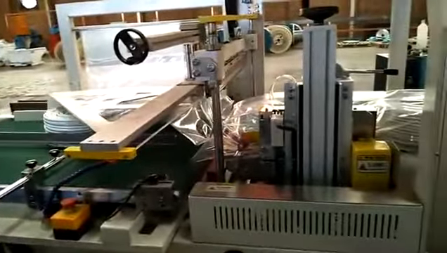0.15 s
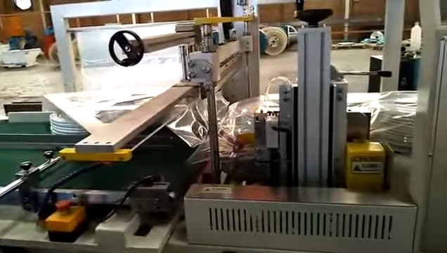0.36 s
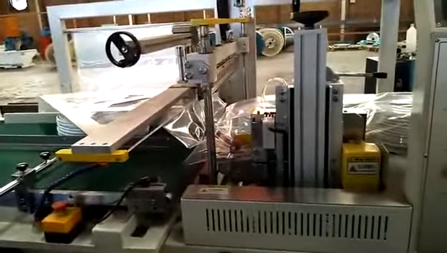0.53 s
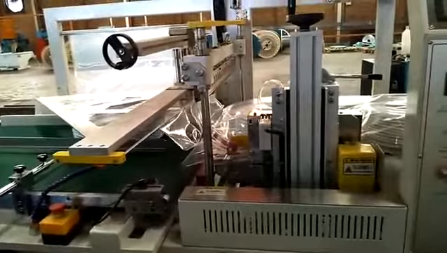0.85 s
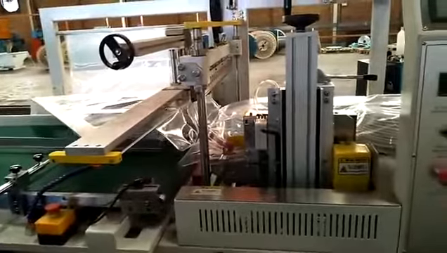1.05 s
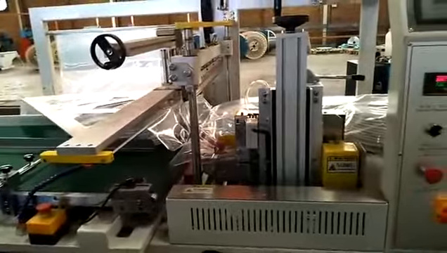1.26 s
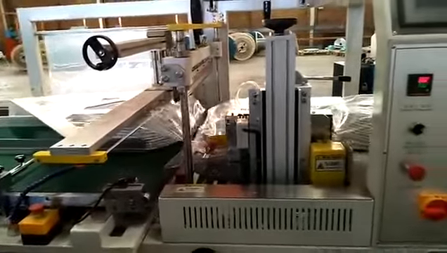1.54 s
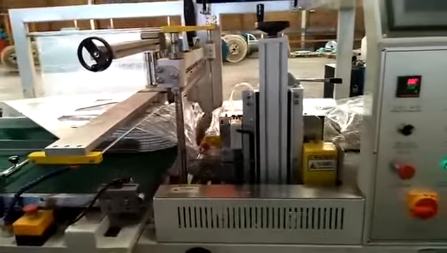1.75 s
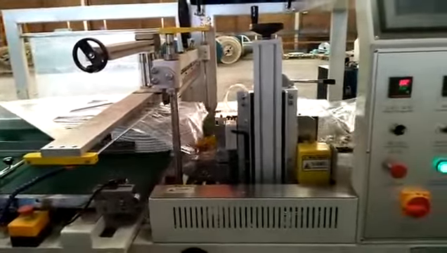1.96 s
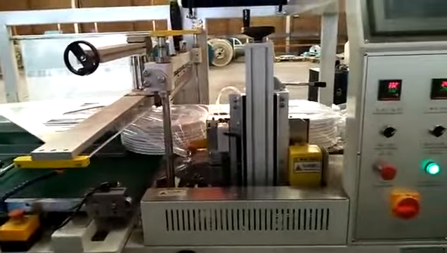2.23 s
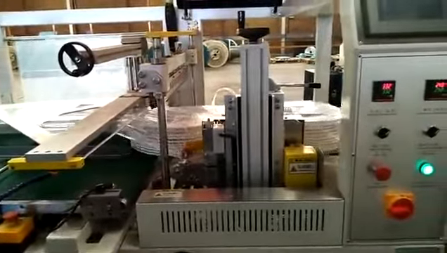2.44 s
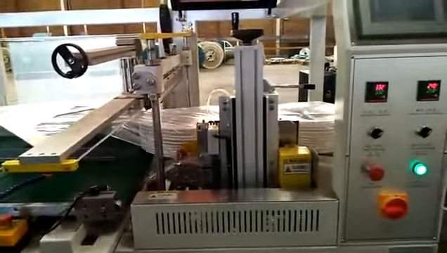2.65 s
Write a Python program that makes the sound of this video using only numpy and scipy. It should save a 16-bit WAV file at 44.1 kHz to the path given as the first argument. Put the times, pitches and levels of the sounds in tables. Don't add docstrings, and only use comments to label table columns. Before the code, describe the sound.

A packing machine hums with beating motors, gear whine and blower hiss; about a second in, a dull knock and short air burst, then a jingling, scraping conveyor chain, captured close on a phone in a hard hall.

```python
import sys
import numpy as np
from scipy import signal
from scipy.io import wavfile
from scipy.ndimage import uniform_filter1d

SR = 44100
rng = np.random.default_rng(int(sys.argv[2]) if len(sys.argv) > 2 else 0)


def how_loud(loudness_db):
    steps = np.asarray(loudness_db, float) / 20
    return 10 ** steps


def persist_wave(psi):
    counts = np.round(np.clip(psi, -1, 1) * 32767).astype(np.int16)
    wavfile.write(sys.argv[1], SR, np.atleast_2d(counts).T)


N = 123480

# freq_hz, left_minus_right_db
PORT_LEAN = [(600, .5), (1300, 2.5), (2400, 5), (3900, 2.5), (7300, -2), (9300, 9), (11300, 4.5),
             (13600, -1)]


def read(points, hz):
    f, value = np.transpose(points)
    return np.interp(np.log(hz + 1), np.log(f + 1), value)


def evened(x):
    return x / np.sqrt(np.mean(abs(x) ** 2) + 1e-20)


def add(mix, s, sound):
    part = mix[:, round(s * SR):][:, :sound.shape[1]]
    part += sound[:, :part.shape[1]]


def sides(lean_db):
    return how_loud(np.array([[.5], [-.5]]) * lean_db)


def wander(width_hz):
    hz = np.fft.fftfreq(N, 1 / SR)
    z = rng.standard_normal((N, 2)) @ np.array([1, 1j])
    return evened(np.fft.ifft(z * np.exp(-(hz / width_hz) ** 2)))


def air(colour, patchy_db):
    # freq_hz, likeness_0_to_1
    port_likeness = [(60, 11), (130, 0.6), (280, 1), (610, 0.66), (1330, -0.28), (2900, 0.03),
                     (6290, -0.07), (13600, -0.13)]
    frames, hz = N // 256 + 5, np.fft.rfftfreq(1024, 1 / SR)
    a, b, c, d, patches = rng.standard_normal((frames, 513, 5)).T
    patches = uniform_filter1d(patches, size=12, axis=0)
    patches = evened(uniform_filter1d(patches, size=14, axis=1))
    same = np.clip(read(port_likeness, hz), -1, 1)[:, None]
    left = a + 1j * b
    right = same * left + np.sqrt(1 - same ** 2) * (c + 1j * d)
    gain = how_loud(read(colour, hz)[:, None] + patchy_db * patches)
    z = np.array([left, right]) * gain * sides(read(PORT_LEAN, hz))[:, :, None]
    return evened(signal.istft(z, nperseg=1024, noverlap=768)[1][:, :N])


def rumble():
    # freq_hz, density_db
    rumble_colour = [(20, -30), (50, -39), (65, 0), (110, -9.5), (276, -2.5), (500, -12), (800, -11),
                     (1500, -16.5)]
    return how_loud(-24.5) * air(rumble_colour + [(2200, -43.5)], patchy_db=0.53)


def hiss():
    # freq_hz, density_db
    hiss_colour = [(1400, -13.5), (2500, -7.5), (3200, -13), (3800, -13.5), (4900, -12.5), (8000, -11.5),
                   (10000, -20), (12000, -29)]
    return how_loud(-21.5) * air([(900, -24.0)] + hiss_colour + [(14500, -37.5)], patchy_db=1.08)


def hum():
    # freq_hz, level_db, wavering_width_hz
    hum_tones = [(134.8, -47, 3.6), (199.8, -41.5, 2.7), (265.8, -30, 4.1), (297.7, -35, 8.8),
                 (331, -40.5, 0.56), (399.8, -31.5, 1.8), (529.6, -43, 5.5), (601, -44.5, 3.5),
                 (627, -39, 4.7), (785.5, -42, 4), (842, -44, 6)]
    steady = 0.86
    t, out = np.arange(N) / SR, np.zeros((2, N))
    for hz, db, width_hz in hum_tones:
        unrest = (1 - steady) * np.clip((hz / 400) ** 5, 1.6 - hz / 500, 5)
        turn = np.exp(2j * np.pi * hz * t)
        shared = evened(steady + unrest * wander(width_hz)) * turn * np.exp(2j * np.pi * rng.random())
        opposed = 0.57 * min(hz / 600, 1) * wander(width_hz) * turn
        out += np.sqrt(2) * how_loud(db) * np.array([shared + opposed, shared - opposed]).real
    return out


def twins():
    # shaft_multiple, level_db, cancelling_s
    twin_orders = [(2, -32, .82), (3, -30, 0.1)]
    shaft_hz, slip_hz = 66.37, .415
    t, out = np.arange(N) / SR, 0
    for k, db, s in twin_orders:
        beat = np.sin(np.pi * k * slip_hz * (t - s))
        out = out + 2 * how_loud(db) * beat * np.cos(2 * np.pi * k * shaft_hz * t)
    return out


def whine():
    # time_s, level_db, wavering_0_to_1
    whine_course = [(0.0, -39.5, 0.2), (0.05, -32.5, 0.2), (0.75, -33, 0), (1.28, -27.5, 0.25),
                    (1.4, -38, 0.1), (1.45, -27, 0.25), (1.56, -47, 0.15), (1.58, -34, 0.3),
                    (1.88, -36, 0.3), (1.95, -44, 0.15), (2.06, -29, 0), (2.12, -39.5, 0.25),
                    (2.27, -30, 0.2), (2.32, -45, 0.15), (2.43, -33, 0.25), (2.8, -34, 0.06)]
    # offset_hz, level_db
    gear_sidebands = [(-277, -11.5), (-240, -6), (-200, -12.5), (-121, -11), (77.5, -12.5), (349, -11),
                      (620.5, -19), (1280.5, -13)]
    mesh_hz, lean_db, port_lag_rad = 2686, 12.5, 0.12
    sideband_hold = .6
    t, (s, course_db, course_shake) = np.arange(N) / SR, np.transpose(whine_course)
    db = np.interp(t, s, course_db)
    shake = np.clip(np.interp(t, s, course_shake), 0, 1)
    left = 1 - shake + shake * wander(4.8)
    right = np.exp(1j * port_lag_rad) * (1 - shake) + shake * wander(5.4)
    out = np.array([left, right])
    for off_hz, side_db in gear_sidebands:
        gain = how_loud(side_db + sideband_hold * (db.mean() - db))
        out = out + gain * np.array([wander(6.6), wander(4.7)]) * np.exp(2j * np.pi * off_hz * t)
    turn = np.exp(2j * np.pi * mesh_hz * t)
    return np.sqrt(2) * how_loud(db) * sides(lean_db) * (out * turn).real


def knocks(mix, bright):
    # start_s, level_db, body_hz, t60_s, click_db
    cylinder_knocks = [
        (1.008, -14, 887, 0.054, -6),
        (1.022, -9.5, 887, 0.047, -21),
        (1.049, -21.5, 887, 0.11, -24),
        (1.296, -18.5, 765, 0.11, -4),
    ]
    t = np.arange(0, .25, 1 / SR)
    for s, db, hz, t60, click_db in cylinder_knocks:
        ring = np.sin(2 * np.pi * hz * t)
        ring += 0.41 * np.sin(2 * np.pi * hz * 1.13 * t) + 0.3 * np.sin(2 * np.pi * hz * 2.4 * t)
        puff = how_loud(click_db - 60 * t / 0.34) * bright[:, round(s * SR):][:, :len(t)]
        body = how_loud(-60 * t / t60) * ring * sides(2.3)
        add(mix, s, how_loud(db) * np.minimum(t / 0.0042, 1) * (body + puff))


def vent():
    # time_s, pressure_db
    vent_pressure = [
        (1.2, -36),
        (1.212, -24),
        (1.225, -10),
        (1.235, -14),
        (1.245, -10.5),
        (1.258, -13),
        (1.272, -15.5),
        (1.285, -20),
        (1.33, -24),
    ]
    # freq_hz, density_db
    nozzle_colour = [(900, -8), (1800, -11.5), (2700, -2), (3200, -6), (4200, -7.5), (7600, -1.5),
                     (10000, -7.5), (14100, -22)]
    # time_s, boost_db
    spool_slams = [
        (1.2285, 3.5),
        (1.2445, 4.5),
        (1.2555, 3),
    ]
    pipe_hz, pipe_width_hz, pipe_db, pipe_s = 3100, 120, -3, 1.245
    slam_s = .0012
    t, (s, db) = np.arange(N) / SR, np.transpose(vent_pressure)
    pipe = (wander(pipe_width_hz) * np.exp(2j * np.pi * pipe_hz * t)).real
    pipe = pipe * np.exp(-((t - pipe_s) / .012) ** 2)
    jet = air(nozzle_colour, patchy_db=1.5) * how_loud(.7 * wander(150.).real)
    jet = jet + how_loud(pipe_db) * pipe * sides(3.)
    slam_db = sum(boost_db * np.exp(-((t - at) / slam_s) ** 2) for at, boost_db in spool_slams)
    return how_loud(np.interp(t, s, db, left=-99, right=-99) + slam_db) * jet


def squeaks(mix):
    # peak_s, level_db, left_minus_right_db, rise_s, fall_s
    roller_squeaks = [
        (2.686, -22.5, 9, 0.013, 0.0071),
        (2.697, -30, -7, .008, .012),
        (2.719, -26, 13, 0.0071, 0.015),
        (2.76, -34, 1, .02, .045),
    ]
    squeak_hz = 5078
    t = np.arange(-.05, .08, 1 / SR)
    for s, db, lean_db, rise, fall in roller_squeaks:
        shape = np.exp(-abs(t / np.where(t < 0, rise, fall)) ** 1.8)
        tone = np.sin(2 * np.pi * squeak_hz * (s + t) + np.array([[0], [.6]]))
        add(mix, s - .05, np.sqrt(2) * how_loud(db) * sides(lean_db) * shape * tone)


def chain_run():
    # time_s, rattle_db
    run_course = [
        (1.29, -59),
        (1.33, -26),
        (1.7, -27),
        (1.94, -24.5),
        (1.98, -30),
        (2.2, -27),
        (2.332, -29),
        (2.5, -22.5),
        (2.8, -31.5),
    ]
    s, db = np.transpose(run_course)
    return how_loud(np.interp(np.arange(N) / SR, s, db))


def rattle(run):
    # freq_hz, level_db, t60_s
    link_modes = [(6550, -9, .05), (7060, -7, .05), (7530, -6, .08), (7910, -1, .06), (8050, -1, .05),
                  (8330, -5, .06), (8610, -3, .06), (8743, -3, .14), (9070, -5, .06), (9770, -7, .08),
                  (10200, -9, .04)]
    taps_per_s, spread_db = 3000, 3
    ring, out = np.arange(6000) / SR, np.zeros((2, N))
    taps = how_loud(spread_db * np.minimum(rng.exponential(1, N), 4)) * (rng.random(N) < taps_per_s / SR)
    taps = taps * run
    which = rng.integers(0, 2 * len(link_modes), N)
    for k, (hz, link_db, t60) in enumerate(link_modes + link_modes):
        port = k // len(link_modes)
        mode = how_loud(link_db - 60 * ring / t60) * np.sin(2 * np.pi * hz * ring)
        mode = mode * np.minimum(ring / 0.00064, 1) / np.sqrt(t60)
        gain = sides(read(PORT_LEAN, hz))[port, 0]
        out[port] += gain * signal.oaconvolve(taps * (which == k), mode)[:N]
    return evened(out) * np.sqrt(np.mean(run ** 2))


def ticks():
    ticks_per_s, tick_s, depth = 90, .004, .8
    train = np.minimum(rng.exponential(1, N), 2) * (rng.random(N) < ticks_per_s / SR)
    t = np.arange(0, 8 * tick_s, 1 / SR)
    pulse = t / tick_s * np.exp(1 - t / tick_s) ** 0.94
    return evened(1 + depth * signal.oaconvolve(train, pulse)[:N])


def scrape_noise():
    colour = [(3000, -34), (5500, -7.0), (7200, -3.5), (8200, -4.5), (10000, -7), (11500, -12.5),
              (14000, -25.5), (15000, -60)]
    return air(colour, patchy_db=-1.5)


def jolts(mix, bright):
    # start_s, peak_db, link_pitch_hz, left_minus_right_db
    chain_jolts = [(1.314, -23, 8740, 0), (1.34, -10, 8100, 0), (1.378, -17, 8230, 0), (1.49, -25, 8100, 0),
                   (1.7, -23, 8500, -3), (1.927, -18, 8000, 0), (2.1404, -19, 8700, -7),
                   (2.153, -16, 7400, -6), (2.26, -9, 7970, -3), (2.482, -17, 8100, 0),
                   (2.552, -11, 8000, 0), (2.595, -16, 8000, 0), (2.792, -9.5, 7300, 0),
                   (1.3252, -12, 8240, -2), (1.4535, -14, 7780, -4), (1.5676, -11.5, 8220, 1),
                   (1.6156, -21, 8160, -5), (1.7683, -8, 7840, 0), (1.7982, -13, 8100, -6),
                   (1.8321, -15.5, 7920, -4), (1.86, -11, 7950, -7.5), (1.9119, -15, 7940, -15),
                   (2.0311, -8.5, 8020, -2), (2.084, -10.5, 8600, 2), (2.122, -18, 8070, -9),
                   (2.2432, -9.5, 7800, -5), (2.2972, -7, 7600, -3), (2.3604, -12.5, 7580, -4),
                   (2.4218, -15, 7870, -11), (2.4572, -14, 8270, -4), (2.496, -11, 8670, -6),
                   (2.537, -8, 7900, -2), (2.5769, -29, 8800, 1), (2.6433, -13.5, 7800, -1),
                   (2.7291, -33, 7900, -14), (2.757, -23, 8600, -15)]
    port_shift = np.array([[1.05], [.98]])
    jolt_db, ring_db = -8, 4
    body_t60_s, ring_t60_s = 0.082, 0.056
    for s, db, hz, lean_db in chain_jolts:
        t = np.arange(0, min(.12, N / SR - s), 1 / SR)[:-2]
        chance = rng.random((2, 2))
        ring = 0
        for k, f in enumerate((1, 1.045)):
            ring = ring + np.sin(2 * np.pi * (hz * f * port_shift * t + chance[:, k:k + 1]))
        ring = how_loud(ring_db - 60 * t / ring_t60_s) * ring
        body = how_loud(-60 * t / body_t60_s) * bright[:, round(s * SR):][:, :len(t)]
        add(mix, s, how_loud(db + jolt_db) * sides(lean_db) * np.minimum(t / 0.002, 1) * (body + ring))


def scene():
    mix = rumble() + hiss() + hum() + twins() + whine() + vent()
    wide_colour = [(500, -33), (2500, -9), (4000, -18), (5500, -12), (7600, -6), (10500, -16), (14000, -34)]
    knocks(mix, air(wide_colour, patchy_db=1.5))
    squeaks(mix)
    run, scrape = chain_run(), scrape_noise()
    mix += rattle(run) + run * scrape * ticks()
    jolts(mix, np.roll(scrape, SR, axis=1))
    return mix


def starve(x):
    # freq_hz, readiness_to_drop_sigmas
    starved_bands = [(2800, -5), (3750, -.5), (4300, -.6), (4900, -2), (10200, -3.2), (11400, -.3),
                     (12800, -.9), (14200, .9)]
    starve_per_db, rescue_per_db = .13, .25
    thin_sigmas, thin_over = 1.3, 1.45
    mid_side = np.array([x[0] + x[1], x[0] - x[1]]) / 2
    hz, t, z = signal.stft(mid_side, SR, nperseg=1024, noverlap=768)
    band = np.floor(np.where(hz < 6000, hz / 170, 30 + hz / 690)).astype(int)
    luck = rng.standard_normal((len(t) // 4 + 1, band.max() + 1, 3)).T
    luck = evened(uniform_filter1d(luck[:1] + .2 * luck[1:], size=3, axis=2))
    luck = luck[:, band][:, :, np.arange(len(t)) // 4]
    power = abs(z) ** 2
    busy_db = 10 * np.log10(np.mean(power[:, (hz > 7000) & (hz < 10000)], axis=(0, 1)) + 1e-14)
    weak_db = 10 * np.log10(np.mean(power[:, hz > 11500], axis=(0, 1)) + 1e-14)
    mask_db = busy_db - weak_db
    near = np.sqrt(abs(uniform_filter1d(power, size=9, axis=1))) + 1e-9
    rise_db = 20 * np.log10(near / np.median(near, axis=2, keepdims=True))
    spare = luck + rescue_per_db * np.maximum(rise_db - 4, 0) - read(starved_bands, hz)[:, None]
    spare = spare - starve_per_db * (mask_db - np.median(mask_db))
    whole = spare > thin_sigmas
    thinned = (spare > 0) * (spare <= thin_sigmas) * (abs(z) > thin_over * near)
    kept = whole + thin_over * thinned
    mid, side = signal.istft(z * kept, SR, nperseg=1024, noverlap=768)[1][:, :N]
    return np.array([mid + side, mid - side])


def top_cut(x):
    return signal.sosfilt(signal.butter(12, 14250, fs=SR, output="sos"), x)


def record(dry):
    low_cut = signal.butter(4, 64, "high", fs=SR, output="sos")
    thinned = starve(signal.sosfilt(low_cut, dry))
    clipped = np.clip(thinned, -1.0, 1.0)
    return top_cut(clipped)


dry = scene()
out = record(dry)
persist_wave(out)
```